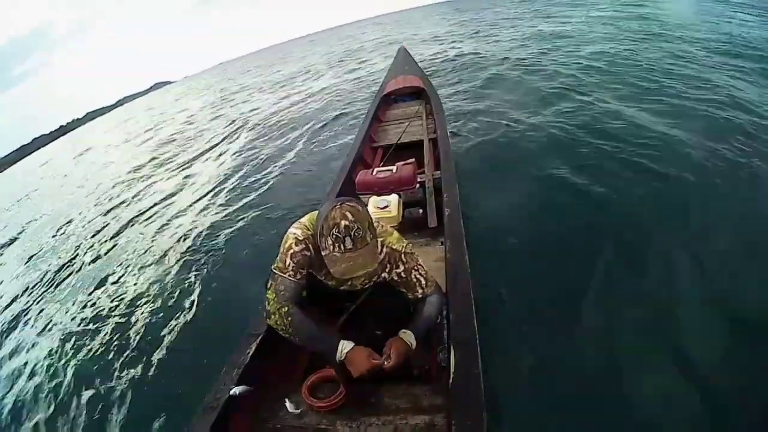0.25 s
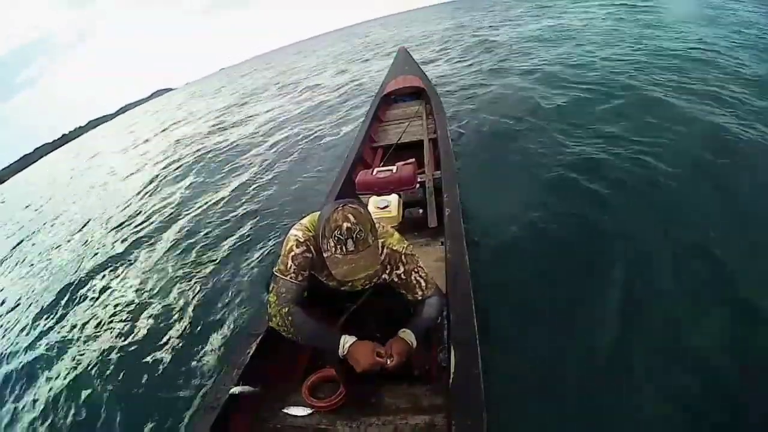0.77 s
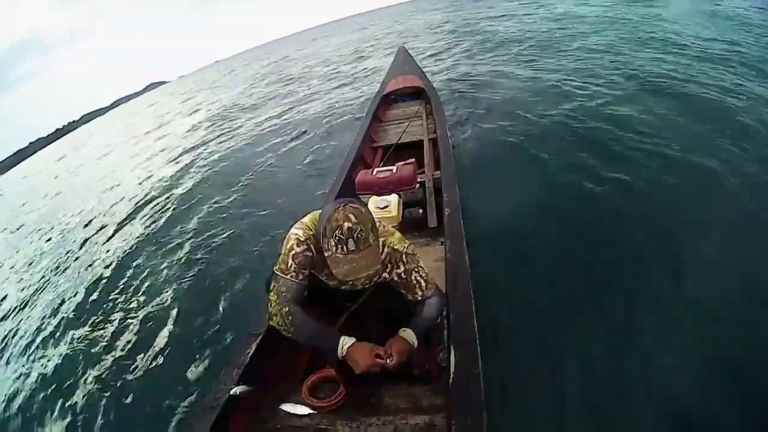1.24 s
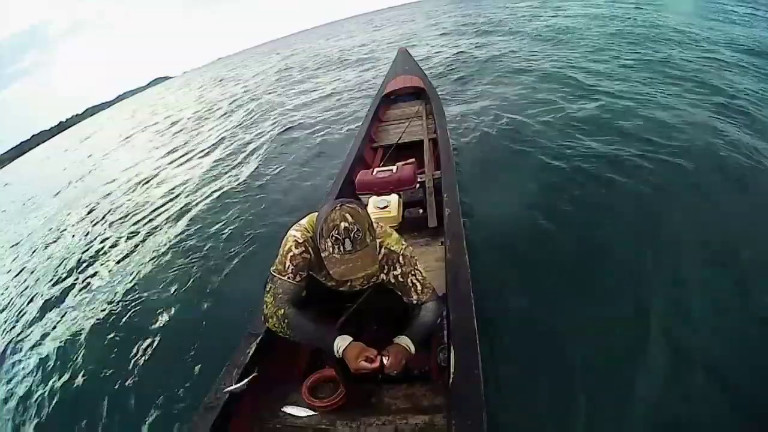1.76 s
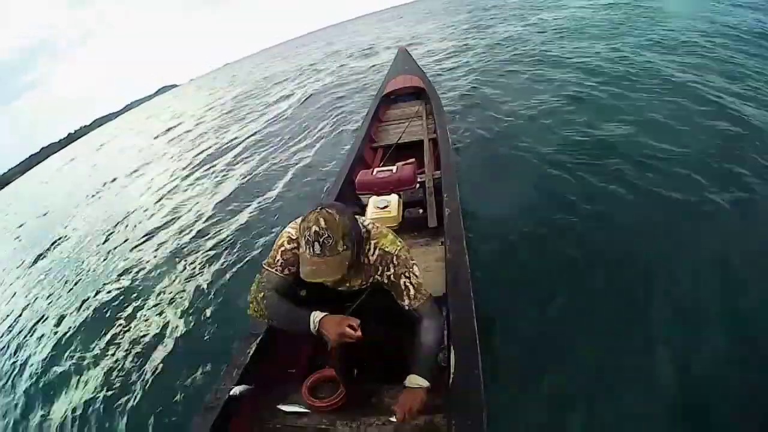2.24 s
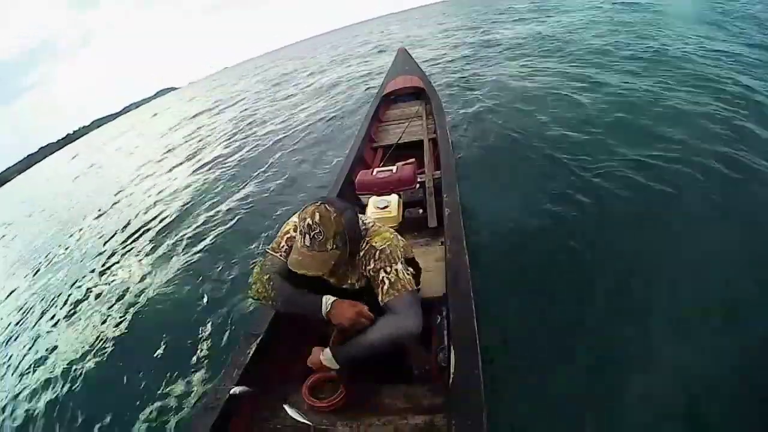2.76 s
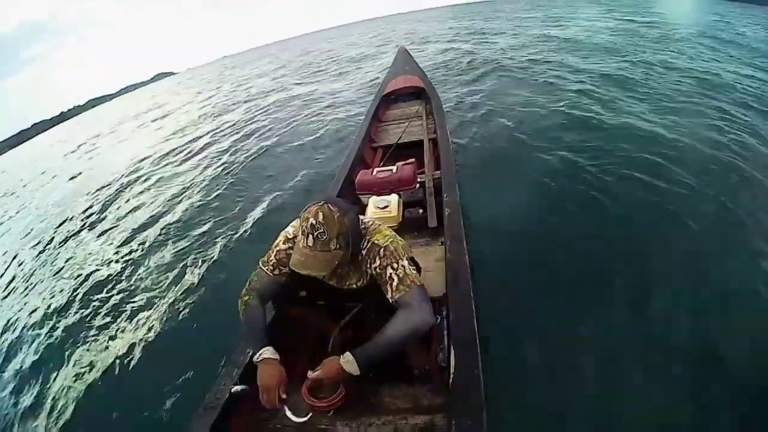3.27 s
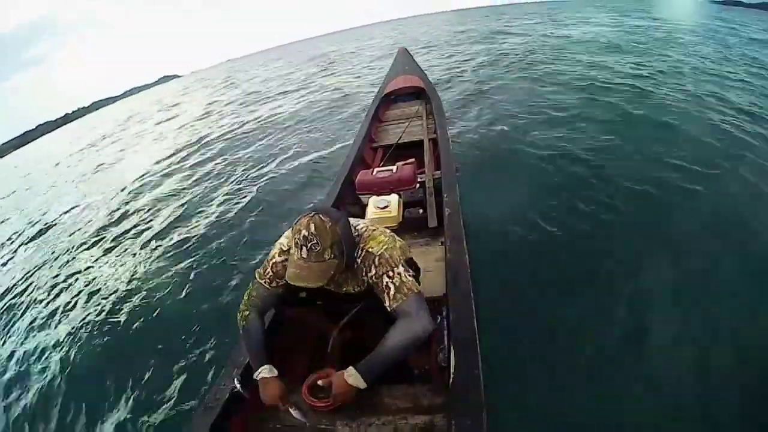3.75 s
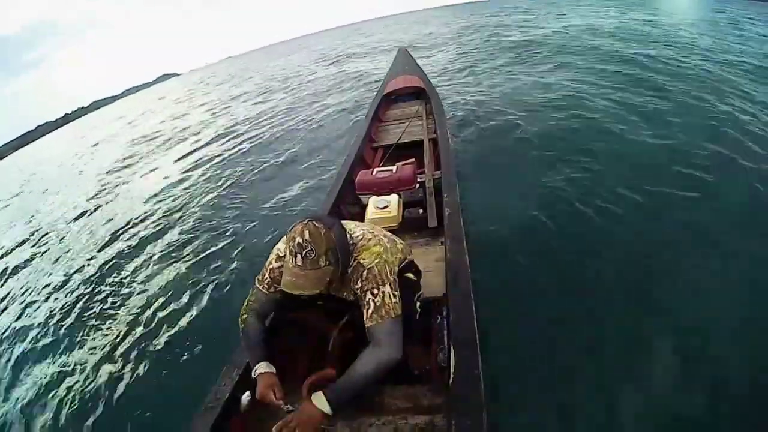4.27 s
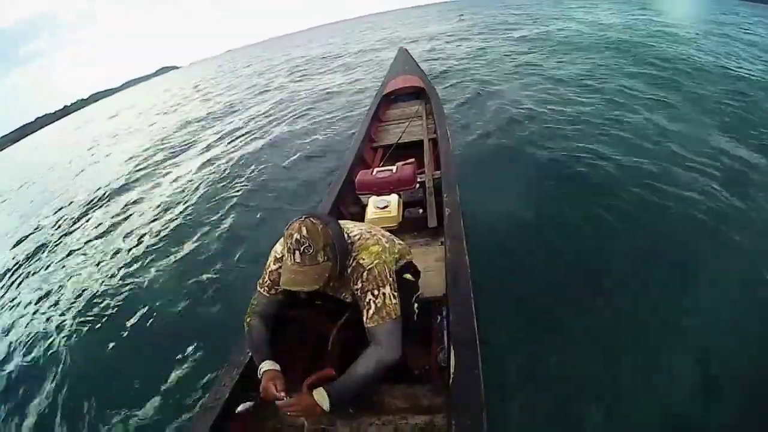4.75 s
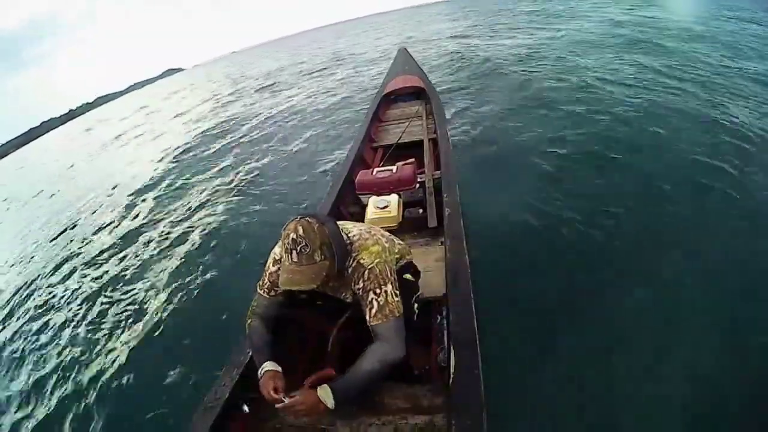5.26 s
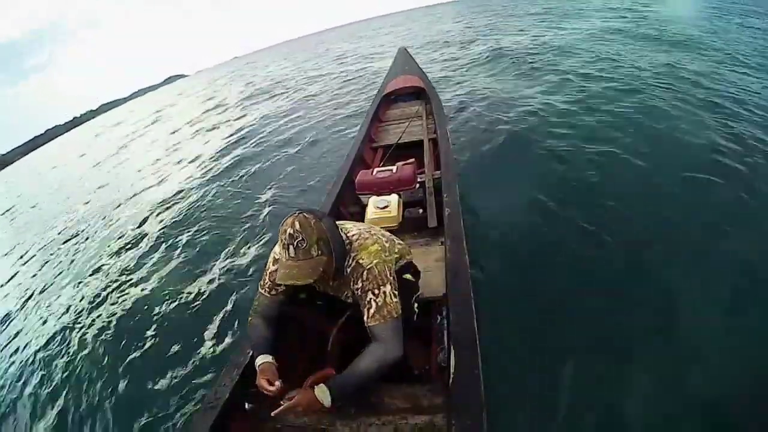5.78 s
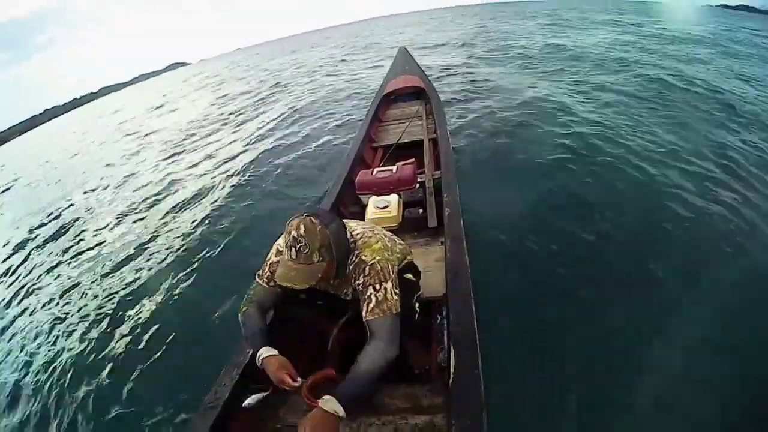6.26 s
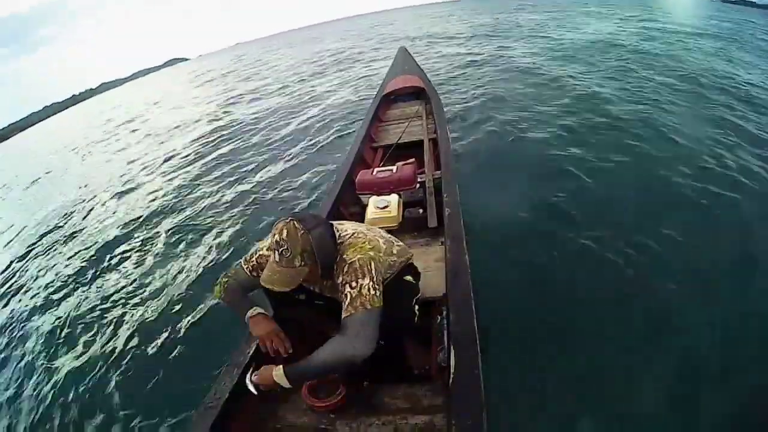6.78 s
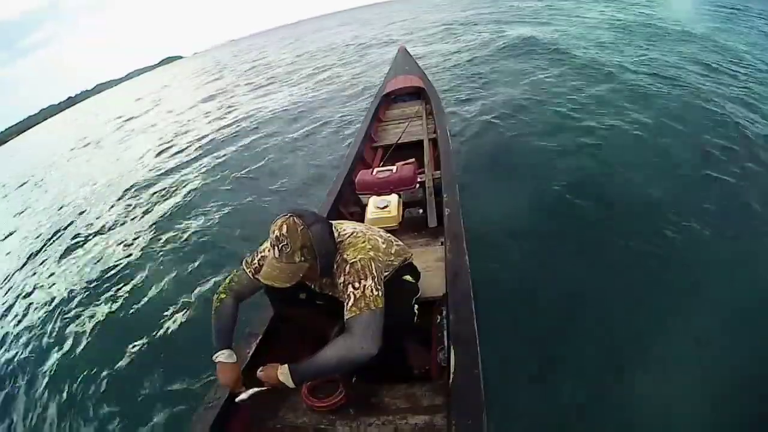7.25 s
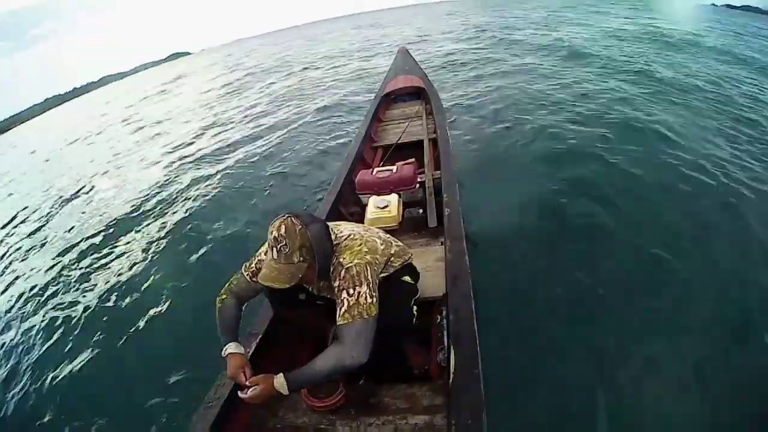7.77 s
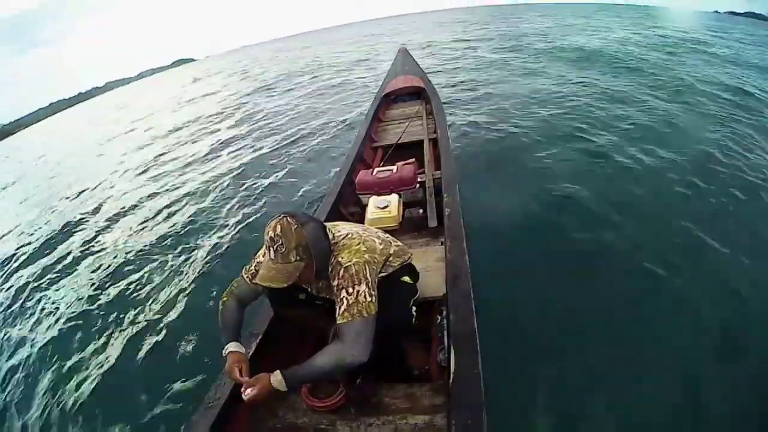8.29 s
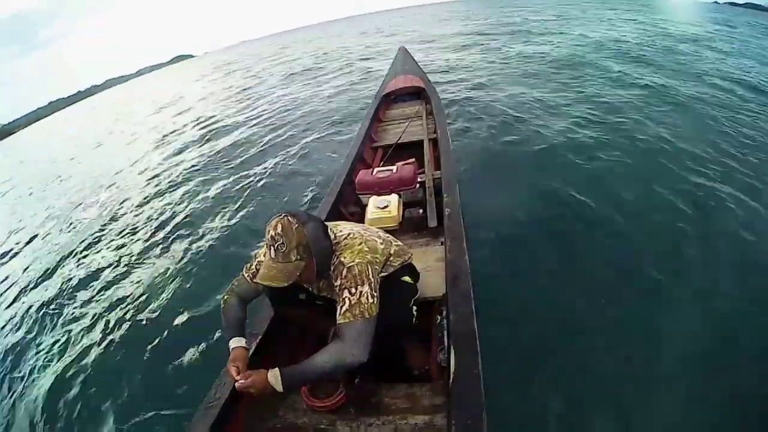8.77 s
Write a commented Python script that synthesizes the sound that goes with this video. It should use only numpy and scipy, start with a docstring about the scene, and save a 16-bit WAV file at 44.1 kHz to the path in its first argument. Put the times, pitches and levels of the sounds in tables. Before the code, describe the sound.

Irregular low, muffled thumps and woody knocks on a hollow canoe hull, with sharp clicks, small water laps and faint sea wash.

```python
"""On a calm sea, a fisher handles line and catch in a drifting wooden canoe.
Feet, gear and wavelets thump the hollow hull: decaying tones plus noise through hull resonances.
Knocks and rubs are gritty noise ringing the wood; water laps in random swells and plops as rising tones.
A camera on the boat hears it muffled, with buzz, sizzle and a faint narrow hiss over a soft wash of sea and air.
Its waveform jumps at buffer edges, which puts sharp clicks on the thumps."""
import sys
import numpy as np
from scipy import signal
from scipy.fft import rfft, irfft
from scipy.io import wavfile
from scipy.ndimage import uniform_filter1d

SR = 44100
rng = np.random.default_rng(int(sys.argv[2]) if len(sys.argv) > 2 else 0)


def to_wav(s):
    """Save 16-bit WAV."""
    ch = np.atleast_2d(s).T  # columns
    pcm = np.round(np.clip(ch, -1, 1) * 32767)  # PCM
    wavfile.write(sys.argv[1], SR, pcm.astype(np.int16))


N = 398216
TIME = np.arange(N) / SR  # seconds

# Levels in these tables are before each source's own mixing levels.
# Thumps on the hull. Each row: start in seconds, level in dB, pitch in Hz, time to fall 60 dB in seconds.
HULL_THUMPS = [(0.259, -30, 170, 0.18), (0.428, -20.5, 168.5, 0.14), (0.579, -28.5, 163.7, 0.64),
               (0.698, -32.5, 191.7, 1), (0.974, -37, 165.6, 0.22), (1.12, -32.5, 155.7, 0.3),
               (1.502, -32.5, 163, .11), (1.593, -27.5, 161, 0.37), (1.697, -25.5, 164.5, 0.08),
               (1.839, -27.5, 163.7, 0.11), (2.335, -40.5, 154, 0.2), (2.472, -37.5, 176.3, 0.18),
               (2.696, -21, 167, 0.036), (2.875, -20, 175.4, 0.07), (3.064, -26, 190.5, 0.06),
               (3.23, -25, 158, 0.063), (3.396, -26.5, 154, 0.092), (3.486, -32, 157.5, 0.15),
               (3.628, -35.5, 167.6, 0.27), (3.917, -26, 164, 0.12), (4.067, -34, 204.4, 0.66),
               (4.092, -24, 164.6, 0.099), (4.704, -30.5, 207, 0.15), (4.819, -15.5, 157.5, 0.21),
               (4.914, -28, 160.6, 0.63), (4.993, -23.5, 208.6, 0.092), (5.122, -18, 170.1, 0.067),
               (5.279, -19.5, 166.1, .14), (5.925, -36, 156, 0.13), (6.065, -24, 162.4, .22),
               (6.147, -26, 160, 0.17), (6.394, -28.5, 165.8, 0.21), (6.879, -27.5, 138, 0.13),
               (6.991, -37, 154, 0.26), (7.145, -28, 167.8, 0.093), (7.252, -35.5, 167, 0.24),
               (7.289, -29.5, 159, 0.14), (7.791, -36.5, 157, 0.13), (8.513, -34, 166.4, 0.53),
               (8.925, -38.5, 176, 0.067)]
# Hard knocks of gear. Each row: start in seconds, level in dB.
GEAR_KNOCKS = [(0.269, -34), (0.351, -45.5), (0.434, -26.5), (0.706, -35.5), (1.779, -27.5), (1.829, -37),
               (4.712, -34.5), (4.82, -24), (5.128, -44), (6.143, -31.5)]
# Light rubs along the boards. Each row: start in seconds, level in dB.
BOARD_RUBS = [(0.599, -56.5), (1.6, -58.5), (4.821, -57), (6.056, -51), (6.751, -62.5), (7.38, -66),
              (7.541, -63.5)]
# Ringing of the whole hull. Each row: pitch in Hz, width in Hz, relative level in dB.
HULL_MODES = [(31.8, 16, -3), (81.5, 12.4, -1), (115.6, 13.1, 2.5), (165.1, 20.3, 1.5), (217.5, 17.4, 0),
              (261.2, 22.7, -5.5), (324.4, 57.6, -11)]
# Ringing of the thin boards. Each row: pitch in Hz, width in Hz, relative level in dB.
BOARD_MODES = [(833, 72, 0), (1046, 62, -3), (1227, 104, 2), (1680, 240, -10), (2050, 170, -14.5)]
# Ringing of the side planks. Each row: pitch in Hz, width in Hz, relative level in dB.
PLANK_MODES = [(254, 49, -1.5), (334.6, 24, 4.5), (421, 26, -7), (497, 36, -6), (834, 170, -20.5)]
# How much the sea stirs around the hull. Each row: time in seconds, level in dB.
SEA_STIR = [(0.0, -46), (0.7, -45), (1.26, -90.5), (1.56, -68), (1.68, -40), (2.16, -71.5), (3.34, -47),
            (3.85, -72.5), (4.05, -61.5), (4.65, -60), (4.98, -56), (5.53, -63), (6.14, -57), (7.87, -50),
            (8.0, -59), (9.03, -56.5)]
# Water plops. Each row: start in seconds, level in dB, starting pitch in Hz.
WATER_PLOPS = [(2.126, -55, 830), (2.13, -55, 1320), (3.722, -59.5, 1330), (4.421, -50.5, 1286),
               (7.656, -63.5, 1210), (7.799, -50, 1060), (7.907, -40.5, 813)]
# The buffer edges that crack loudest. Each row: time in seconds, jump in dB.
LOUD_CLICKS = [(0.2917, -39.5), (0.4539, -23), (0.7327, -32.5), (1.1508, -38), (1.5219, -40),
               (2.7062, -30.5), (2.8923, -27), (3.0779, -33), (3.4032, -37.5), (3.937, -42.5),
               (4.0761, -38), (4.0996, -35.5), (4.123, -39.5), (4.8194, -37), (4.8424, -25.5),
               (4.8658, -31.5), (4.9357, -35), (5.1677, -34), (5.3068, -35.5), (5.9574, -42.5),
               (6.0965, -32), (6.1429, -34), (6.4911, -41), (7.1646, -38), (7.3038, -37.5), (7.3272, -39),
               (7.7218, -45), (7.9074, -40.5), (8.9526, -47.5)]
# Tone colour of open sea and air. Each row: frequency in Hz, relative level in dB per Hz.
AIR_COLOUR = [(15, -54), (25, 1), (87, -5.5), (170, 2.5), (394, -20.5), (1020, -30.5), (1230, -29),
              (1650, -33), (3430, -39), (6210, -43.5), (12200, -49.5), (16000, -57.5)]

THUMP_RISE_S = 0.02  # every thump swells alike
KNOCK_T60_S, RUB_T60_S = 0.1, 0.2  # T60 is the time to fall 60 dB
KNOCK_BOARDS_DB = -22.5  # knocks drive the boards less than the planks
PLOP_RISE_S, PLOP_T60_S = 0.0041, 0.052
# Each thump rocks the boat and the water sloshes on; the dB is against the thump.
SLOSH_DB, SLOSH_RISE_S, SLOSH_T60_S = -17.5, 0.025, 0.46
AIR_TREBLE_DB = -82.5  # level of the wash above 2500 Hz
BUFFER, FIRST_EDGE = 1024, 626  # the camera's buffer length and first edge, in samples
HEAL_S = 0.0014  # how quickly a jump fades on either side
CUTOFF_HZ = 16000


def from_db(db):
    """Turn decibels into a plain multiplier."""
    return 10 ** (np.asarray(db) / 20)


def rms_one(x):
    """Scale a signal to an average power of one."""
    return x / np.sqrt(np.mean(x ** 2) + 1e-20)


def cut(x, hz, kind, order=2):
    """Remove highs ("low" keeps the lows) or lows ("high") with a Butterworth filter."""
    return signal.sosfilt(signal.butter(order, hz, kind, fs=SR, output="sos"), x + 1e-18)


def drift(rate_hz):
    """Smoothed random wandering with a spread of one; the first second settles the filter."""
    return rms_one(cut(rng.standard_normal(N + SR), rate_hz, "low")[SR:])


def body(force, modes):
    """A force rings several resonances side by side; white noise keeps its power on the way through."""
    out, power = 0, 0
    for k, (hz, width_hz, db) in enumerate(modes):
        r = np.exp(-np.pi * width_hz / SR)  # a wider resonance dies sooner
        poles = [1, -2 * r * np.cos(2 * np.pi * hz / SR), r * r]
        zeros = np.array([1, 0, -1]) * (1 - r * r) / 2
        ringing = signal.lfilter(zeros, poles, force + 1e-18)
        out = out + (-1) ** k * from_db(db) * ringing  # neighbours have opposite signs
        power += from_db(db) ** 2 * np.pi * width_hz / SR
    return out / np.sqrt(power)


def swell(s, db, rise_s, t60):
    """A soft contact builds up and dies away within half a second: its samples, age and height."""
    start = max(int(s * SR), 0)
    span = slice(start, min(start + SR // 2, N))
    age = TIME[span] - TIME[start]
    fall_db = -60 * np.maximum(age - rise_s, 0) / t60
    rise = np.sin(np.pi / 2 * np.minimum(age / rise_s, 1)) ** 2
    return span, age, from_db(db + fall_db) * rise


def thumps(hold_s=0.067, ring_db=-11, sag=0.046, sag_s=0.009, throb_db=-3.0,
           lowest_hz=45, top_hz=650, stiffen=0.22):
    """Each thump throbs at the pitch of the spot that is hit and shakes the whole hull."""
    throb, shake_power = np.zeros(N), np.zeros(N)
    usual_db = np.mean([row[1] for row in HULL_THUMPS])
    for (s, db, hz, t60), turn in zip(HULL_THUMPS, rng.random(len(HULL_THUMPS))):
        span, age, height = swell(s, db, THUMP_RISE_S, t60)
        # the shaking grows more slowly than the blow
        shake_power[span] += (height * from_db(stiffen * (usual_db - db))) ** 2
        # the pitch starts high and settles
        cycles = hz * (age + sag * sag_s * (1 - np.exp(-age / sag_s)))
        # the water soon damps the throb
        damped = height / np.sqrt(1 + (age / hold_s) ** 4)
        throb[span] += damped * np.sin(2 * np.pi * (cycles + turn))
    # a brief blow hardly moves the slowest modes of the hull
    force = cut(np.sqrt(shake_power) * rng.standard_normal(N), lowest_hz, "high", order=1)
    ring = cut(body(force, HULL_MODES), top_hz, "low")
    return from_db(throb_db) * throb + from_db(ring_db) * ring


def scuffs(boards_db=2, planks_db=-2, strike_db=17, grain_db=3,
           top_hz=2400, planks_top_hz=1100, rise_s=0.0026):
    """A strike and gritty slide ring the wood: knocks reach planks and boards, rubs only the boards."""
    knocks, rubs = np.zeros((2, N))
    grit = rms_one(rng.standard_normal(N) * from_db(grain_db * drift(182)))
    for force, events, t60 in ((knocks, GEAR_KNOCKS, KNOCK_T60_S), (rubs, BOARD_RUBS, RUB_T60_S)):
        for s, db in events:
            span, age, height = swell(s, db, rise_s, t60)
            force[span] += height * grit[span]
            force[span.start] += from_db(db + strike_db)  # the strike is one sample long
    boards = cut(body(rubs + from_db(KNOCK_BOARDS_DB) * knocks, BOARD_MODES), top_hz, "low")
    planks = cut(body(knocks, PLANK_MODES), planks_top_hz, "low")
    return from_db(boards_db) * boards + from_db(planks_db) * planks


def lapping(hull_db=-1, rustle_db=-78, follow=0.5, hull_top_hz=600, boards_top_hz=2000):
    """Wavelets slap the hull and gurgle along the boards; the gurgle follows half the dB change."""
    lap_db = water_level()
    slaps = wavelets(per_s=18, spread_db=2, rise_s=0.01, t60=0.17)
    push = from_db(lap_db + hull_db) * slaps * rng.standard_normal(N)
    gurgle_db = rustle_db + follow * (lap_db - lap_db.mean())
    gurgle = from_db(gurgle_db) * wavelets(per_s=23, spread_db=17, rise_s=0.022, t60=0.038)
    hull = cut(body(push, HULL_MODES), hull_top_hz, "low")
    boards = cut(body(gurgle * rng.standard_normal(N), BOARD_MODES), boards_top_hz, "low")
    return hull + boards


def water_level(sea_db=3):
    """The sea's own stir plus the slosh after each thump, added as power and given in dB."""
    power = from_db(np.interp(TIME, *np.transpose(SEA_STIR)) + sea_db) ** 2
    for s, db, *_ in HULL_THUMPS:
        span, age, height = swell(s, db + SLOSH_DB, SLOSH_RISE_S, SLOSH_T60_S)
        power[span] += height ** 2
    return 10 * np.log10(power)


def wavelets(per_s, spread_db, rise_s, t60):
    """Small laps of random size and timing swell quickly and drain away; average power is one."""
    power = np.zeros(N)
    for k, (delay, size) in enumerate(rng.uniform(-1.06, 1, (400, 2))):
        s = (k + delay) / per_s
        if s < TIME[-1]:
            span, age, height = swell(s, size * spread_db, rise_s, t60)
            power[span] += height ** 2
    return rms_one(np.sqrt(power))


def plops(climb=1.9, wobble=0.34, splash_db=-20):
    """A trapped bubble rings, wobbles and climbs in pitch, with a little splash around it."""
    tone, splash = np.zeros((2, N))
    phase = wobble * drift(170)  # radians
    for s, db, hz in WATER_PLOPS:
        span, age, height = swell(s, db, PLOP_RISE_S, PLOP_T60_S)
        cycles = hz * age * (1 + climb * age / 2)
        tone[span] += height * np.sin(2 * np.pi * cycles + phase[span])
        splash[span] += height
    return tone + from_db(splash_db) * body(splash * rng.standard_normal(N), BOARD_MODES)


def buzz(motion, buzz_db=-39, sizzle_db=-43):
    """The camera mount buzzes on wide downward swings, and a thin high sizzle follows the boat's sound."""
    touching = np.clip((-motion - 0.065) / 0.025, 0, 1)  # 0 is free, 1 is full contact
    mount_modes = [(2000, 430, 7.5), (3550, 840, -3), (4470, 410, -2)]
    chatter = body(touching * rng.standard_normal(N), mount_modes)
    strength = np.sqrt(np.maximum(uniform_filter1d(motion ** 2, size=512), 0))
    sizzle = body(strength * rng.standard_normal(N), [(11978, 35, -3), (12269, 28, 0)])
    return from_db(buzz_db) * chatter + from_db(sizzle_db) * sizzle


def buffer_clicks(x, loud_db=7, small_db=3.0, spread_db=4.0, ceiling_db=-33):
    """The waveform jumps at buffer edges and heals on both sides; most jumps grow with the sound."""
    edges = np.arange(FIRST_EDGE, N, BUFFER)
    strength = np.sqrt(np.maximum(uniform_filter1d(x ** 2, size=400), 0))[edges]
    jumps = strength * from_db(small_db + spread_db * rng.standard_normal(len(edges)))
    ceiling = from_db(ceiling_db)
    jumps = ceiling * np.tanh(jumps / ceiling)
    # the loudest clicks have their own set sizes
    for s, db in LOUD_CLICKS:
        jumps[np.argmin(np.abs(edges - s * SR))] = from_db(db + loud_db)
    steps = np.zeros(N)
    steps[edges] = jumps * rng.choice([-1, 1], len(edges))
    lag = np.arange(-BUFFER // 2, BUFFER // 2 + 1) + 0.5
    jump_shape = np.sign(lag) / 2 * np.exp(-np.abs(lag) / (HEAL_S * SR))
    return signal.fftconvolve(steps, jump_shape, "same")


def air(bass_db=-9):
    """A faint even wash of sea and air: noise given a tone colour, its level set by its treble."""
    hz, db = np.transpose(AIR_COLOUR)
    bins_hz = np.maximum(np.fft.rfftfreq(N, 1 / SR), 1)
    shape_db = np.interp(np.log(bins_hz), np.log(hz), db)
    shape_db = shape_db + bass_db / (1 + (bins_hz / 300) ** 4)  # softer below about 300 Hz
    wash = irfft(rfft(rng.standard_normal(N)) * from_db(shape_db), N)
    treble = cut(wash, 2500, "high", order=4)
    return from_db(AIR_TREBLE_DB) * wash / np.std(treble)


def whine(hz=6150, width_hz=250, level_db=-91):
    """A faint narrow hiss of the camera's electronics: noise through one resonance."""
    return from_db(level_db) * body(rng.standard_normal(N), [(hz, width_hz, 0)])


def scene():
    """Mix all sources; the boat's thumps, scuffs and lapping also drive the buzz and sizzle."""
    boat = thumps() + scuffs() + lapping()
    return (boat + buzz(boat) + plops() + air() + whine())[None]


def record(dry):
    """The camera's buffers click, then a steep filter cuts the top."""
    x = dry[0] + buffer_clicks(dry[0])
    top_cut = signal.ellip(8, 0.05, 70, CUTOFF_HZ, fs=SR, output="sos")
    return signal.sosfilt(top_cut, x)[None]


dry = scene()
out = record(dry)
to_wav(out)
```